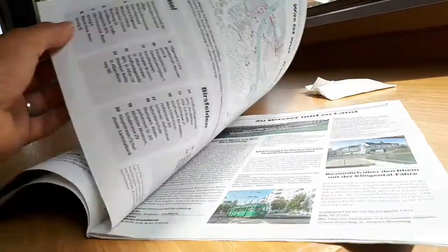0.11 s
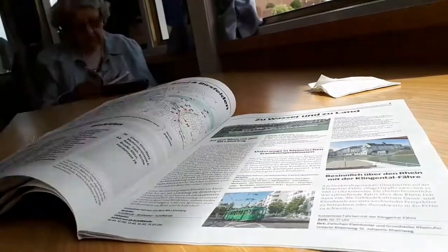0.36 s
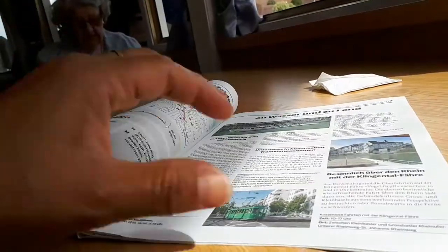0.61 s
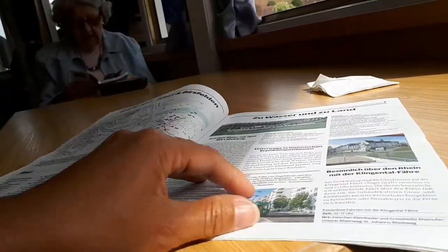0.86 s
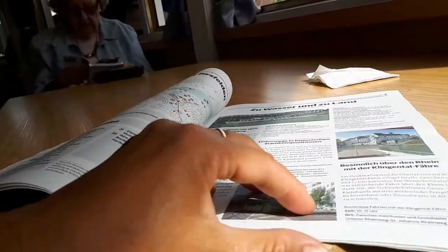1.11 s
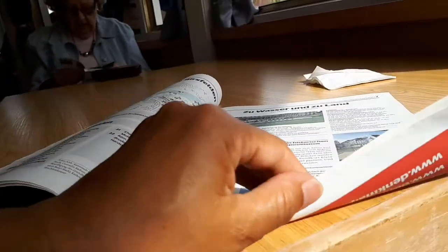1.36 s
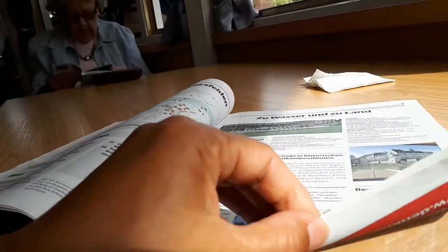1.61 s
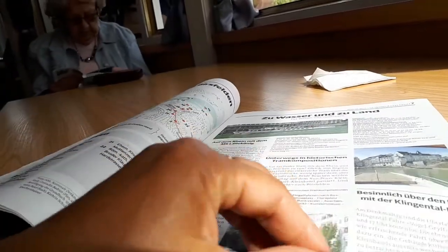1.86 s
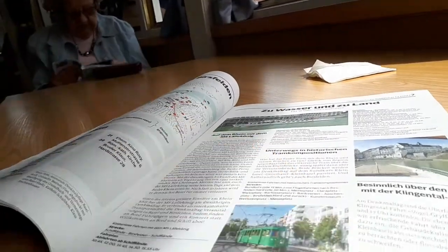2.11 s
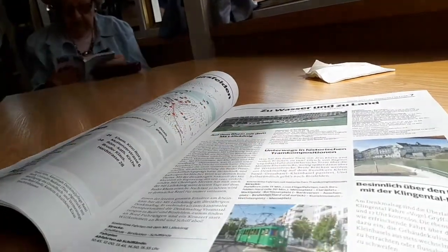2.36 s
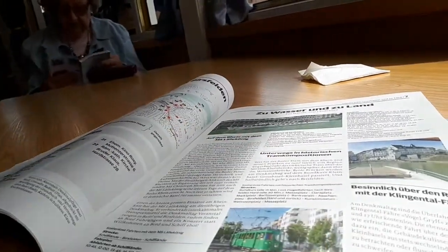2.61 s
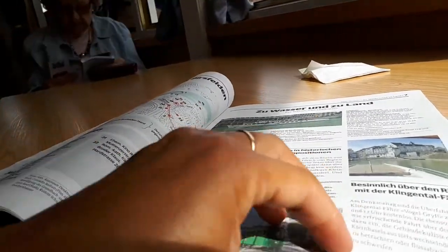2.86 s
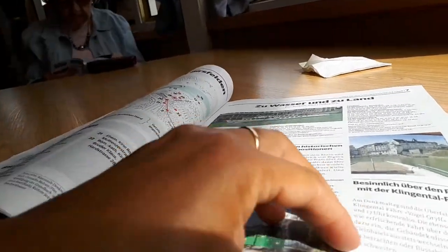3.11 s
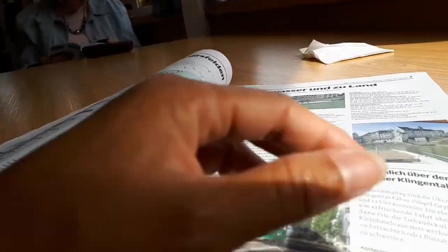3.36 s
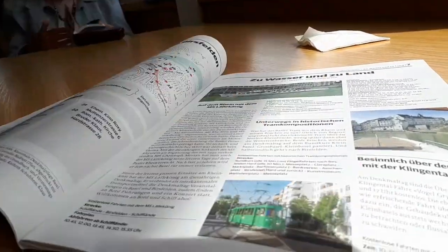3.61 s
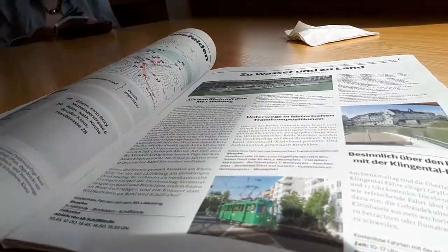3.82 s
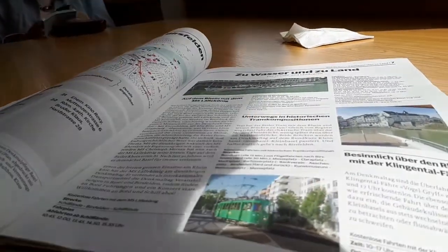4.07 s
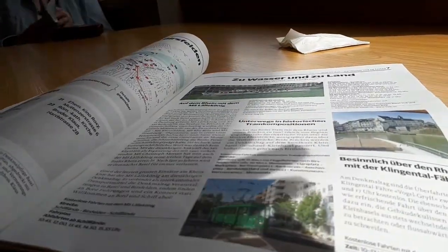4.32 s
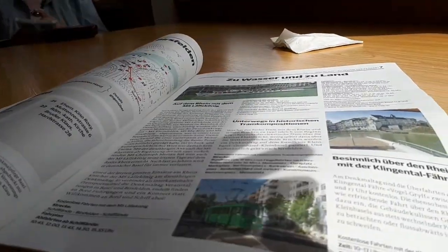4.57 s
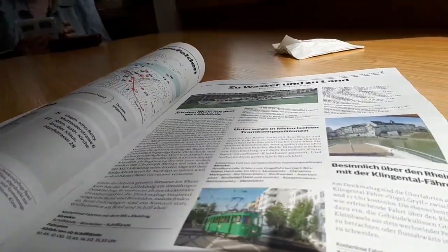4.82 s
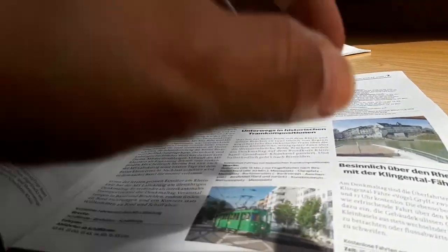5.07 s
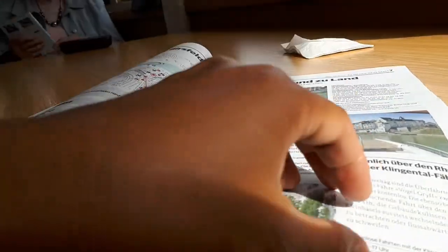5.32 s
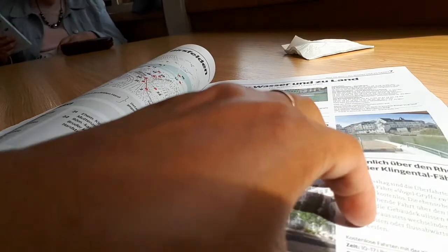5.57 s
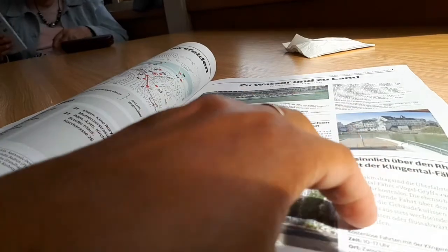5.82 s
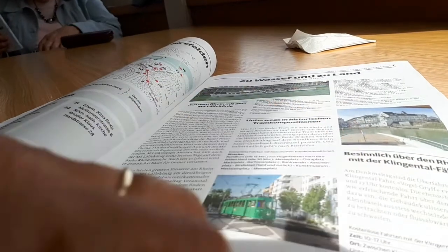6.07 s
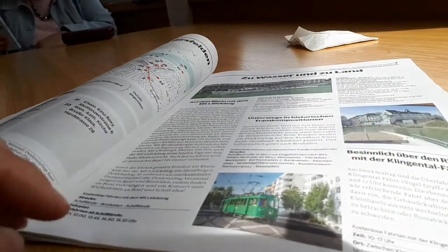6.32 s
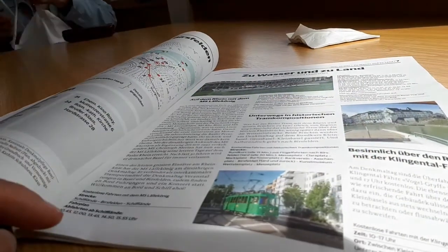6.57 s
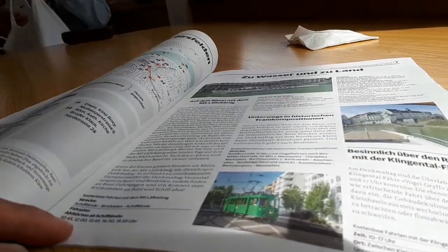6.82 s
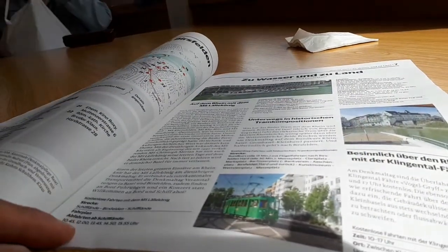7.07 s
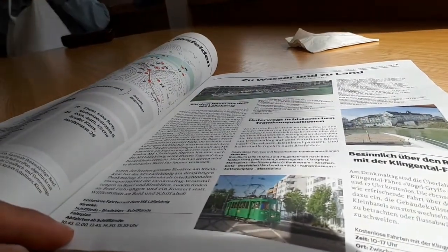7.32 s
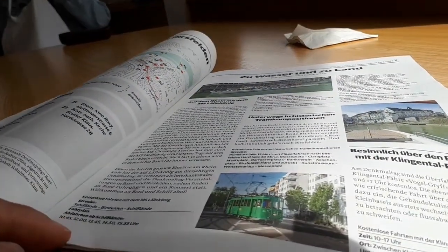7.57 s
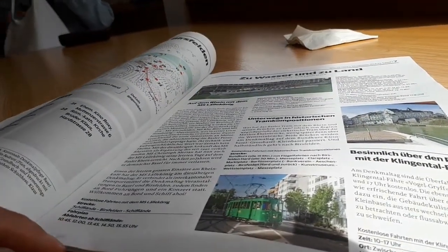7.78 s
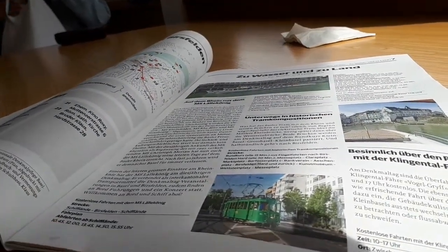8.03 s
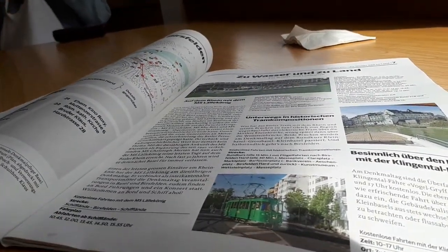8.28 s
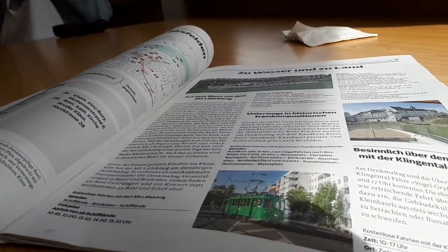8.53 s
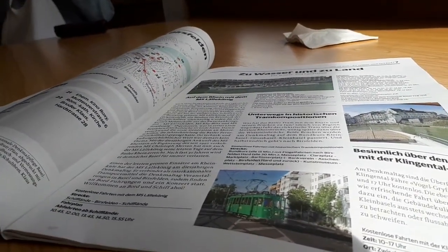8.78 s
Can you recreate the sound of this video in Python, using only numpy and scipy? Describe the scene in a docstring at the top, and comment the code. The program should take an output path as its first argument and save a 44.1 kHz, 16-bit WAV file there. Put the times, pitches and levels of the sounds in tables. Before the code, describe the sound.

Continuous low engine drone dominates, wavering slightly, wrapped in dull rumbling wash from hull and wake. Above it sit thin airy hiss, tiny glass rattles that swell and fade, and a faint high whine strongest around three seconds. Sparse newspaper ticks and soft scrapes punctuate it. Enclosed cabin with short echoes, heard in wide stereo from the tabletop.

```python
"""Inside the cabin of a river boat under way, heard for 8.9 s at two ports of a stereo recorder on a table.
From the start a diesel hums (cosines), hull and wake roar and paper and air hiss (shaped noise), glasses
and a fitting rattle (knocks and noise into resonances), a thin whine sings and creasing paper crackles.
Paper ticks and brushes (noise bursts) begin at 0.27 s, with the strongest near 3.6 and 4.8 s. The whine
is loudest from 2.9 to 3.7 s; after 6.3 s two hum tones shift in timing against the rest."""
import sys
import numpy as np
from scipy import signal
from scipy.fft import rfft, irfft, next_fast_len
from scipy.io import wavfile
from scipy.ndimage import uniform_filter1d

SR = 44100
rng = np.random.default_rng(int(sys.argv[2]) if len(sys.argv) > 2 else 0)


def waveform_to_disk(signal):
    """Save audio, clipped to [-1, 1], as 16-bit WAV at the path in sys.argv[1]."""
    frames = np.transpose(np.atleast_2d(signal))
    scaled = np.clip(frames, -1, 1) * 32767
    samples = np.round(scaled).astype(np.int16)
    wavfile.write(sys.argv[1], SR, samples)


def gain_from_decibels(decibels):
    """Convert decibel values to linear amplitude factors."""
    exponent = np.asarray(decibels, float) / 20
    return 10 ** exponent


N = 392931
T = np.arange(N) / SR  # time of each sample, s
FFT_SIZE = next_fast_len(N)
HZ = np.fft.rfftfreq(FFT_SIZE, 1 / SR)
CYCLE_HZ = 13.796  # mean rate of the engine cycle

# multiples of the engine cycle that swell as the hull loads and unloads: [multiple]
SWELLING_MULTIPLES = (6, 8, 9, 12, 15, 16, 32)
# slow drift of their strength: [t/s, then rms level/dB of multiples 6, 8, 9, 12, 15, 16, 32]
SWELL_LEVELS = [(0.0, -17, -19.5, -27, -31, -26.5, -30, -33),
                (1.2, -18.5, -18.5, -25.5, -33, -24, -31, -34),
                (2.6, -16.5, -21, -25.5, -27, -25.5, -26, -31), (3.8, -17.5, -25, -24, -29, -29, -27, -42),
                (4.4, -16.5, -24, -27.5, -25, -29, -28, -48),
                (5.4, -16, -23.5, -43, -24.5, -35, -27.5, -38),
                (6.3, -17.5, -25, -34, -23.5, -37, -29, -40), (7.0, -16, -17.5, -34, -29, -33, -29.5, -37),
                (7.8, -15, -18.5, -29, -26, -23, -24.5, -46), (8.91, -16, -18.5, -35, -31, -38, -35, -46)]


def shape(table):
    """Gain at every frequency, drawn through points of [f/Hz, level/dB]."""
    hz, db = np.transpose(table)
    return gain_from_decibels(np.interp(np.log(HZ + 1), np.log(hz), db))


def ring(hz, width):
    """Response of one resonance, with gain 1 at its centre; hz and width in Hz."""
    return 1j * HZ * width / (hz ** 2 - HZ ** 2 + 1j * HZ * width)


def through(x, gain):
    """Filter a sound by a frequency response."""
    return irfft(rfft(x, FFT_SIZE) * gain, FFT_SIZE)[..., :N]


def unit(x):
    """Scale to rms 1."""
    return x / np.sqrt(np.mean(x ** 2))


def curves(table):
    """Columns of a time table, with one value per sample."""
    seconds, *columns = np.transpose(table)
    return [np.interp(T, seconds, column) for column in columns]


def walk(rate):
    """Slow random wander: levels drawn rate times a second, smoothed twice; spread near 1."""
    hold = int(SR / rate)
    steps = np.repeat(rng.standard_normal(N // hold + 1), hold)
    return 1.69 * uniform_filter1d(uniform_filter1d(steps, hold), hold)[:N]


def diffuse(x, direct=0.095):
    """Sound from all sides is alike at two spaced ports in the bass only; a share comes straight
    from the right and reaches the left port late."""
    port_gap_m, port_lag_s = 0.18, 0.00037
    from_all_sides = np.sinc(2 * HZ * port_gap_m / 343)  # speed of sound 343 m/s
    from_right = np.exp(2j * np.pi * HZ * port_lag_s)
    alike = (1 - direct) * from_all_sides + direct * from_right
    right = through(x[0], alike) + through(x[1], np.sqrt(1 - abs(alike) ** 2))
    return np.array([x[0], right])


def throb(count, depth_db, turns):
    """Gain that beats count times per engine cycle."""
    return gain_from_decibels(depth_db * np.cos(2 * np.pi * (count * CYCLE_HZ * T - turns)))


def hum(waver_db=1.8, waver_turns=0.03, port_lead=0.006, swell_db=1.5):
    """Near-pure multiples of the engine cycle; the higher ones waver more in level and timing."""
    # steady tones of the engine, before wavering: [multiple of the cycle rate, rms level/dB]
    steady_tones = [(3, -50), (4, -16.5), (7, -28), (10, -36), (11, -30), (13, -41), (14, -32), (17, -39),
                    (18, -35), (19, -35.5), (20, -35.5), (21, -40), (22, -39), (24, -33.5), (25, -40),
                    (26, -37), (28, -37)]
    # bending waves in the plating are faster at high pitch; lead of multiple k = a + b k + c k^2:
    # [a, b, c], all in turns
    lead_turns = (.418, .100, -.0910)
    # the governor hunts: [t/s, lead of the cycle over its mean speed/turns]
    hunting = [(0.0, -.011), (.9, .005), (2.0, .013), (4.3, -.018), (5.0, -.014), (6.7, .013), (7.2, .005),
               (8.91, .005)]
    # multiples 6 and 9 slip against the rest: [t/s, shift of 6/turns, shift of 9/turns]
    slipping = [(0.0, .01, -.04), (6.3, .01, -.04), (6.9, -.09, .11), (8.91, -.10, .11)]
    mount_hz, mount_spread_hz = 133, 11

    def waver_share(k):
        return min((k - 4) / 8, 1)

    tones = [(k, db + waver_share(k) * waver_db * walk(2.67)) for k, db in steady_tones]
    swelling = zip(SWELLING_MULTIPLES, curves(SWELL_LEVELS))
    tones += [(k, db + waver_share(k) * swell_db * walk(5.0)) for k, db in swelling]
    cycle = CYCLE_HZ * T + uniform_filter1d(curves(hunting)[0], size=SR // 2)
    slip = dict(zip((6, 9), curves(slipping)))
    out = 0
    for k, db in tones:
        drift = min(((k - 4) / 8) ** 2, 1) * waver_turns * walk(3.02)
        turns = k * cycle + np.polyval(lead_turns[::-1], k) + drift + slip.get(k, 0)
        if k % 2:
            # odd multiples, from unequal cylinders, turn by up to half a turn across a resonance,
            # perhaps of the mounts
            turns += 0.25 + np.arctan((k * CYCLE_HZ - mount_hz) / mount_spread_hz) / (2 * np.pi)
        port_shift = port_lead * k * np.array([[1], [-1]])  # radians, left and right
        out = out + np.sqrt(2) * gain_from_decibels(db) * np.cos(2 * np.pi * turns + port_shift)
    return out


def roar(echo_db=-14, t60=0.4, flicker_db=0.6):
    """Noise in the plating and wake, coloured by cabin echoes; octaves flicker, panels ring and swell,
    and all of it beats with the engine cycle."""
    # broad colour of hull and wake: [f/Hz, level per Hz/dB]
    roar_colour = [(25, -55.5), (40, -60.5), (55, -54.5), (75, -50), (100, -47), (117, -44), (133, -51),
                   (150, -47), (190, -44), (255, -42), (300, -44), (420, -44), (520, -48), (620, -50),
                   (750, -53.5), (1200, -56.5), (2300, -68), (4300, -77), (5000, -82), (7000, -89),
                   (10000, -105)]
    # slow change of level, above the lowest octaves: [t/s, low roar level/dB, high roar level/dB]
    wash = [(0.0, 0.5, 1.5), (1.1, -0.5, -.5), (2.4, -0.5, 0.5), (3.4, -1, 0.5), (4.4, 0, 0.5),
            (5.5, -0.7, -1.1), (6.1, 0, 0), (7.2, -1.1, -0.7), (8.91, -1.5, 0)]
    # panels that ring within the roar: [f/Hz, width/Hz, level above the roar/dB]
    panels = [(66, 8, 5), (86, 3.5, 9), (163, 4, 8), (181, 6, 1), (209, 4, 7), (253, 6, 2), (326, 10, 1),
              (352, 8, 2.5), (393, 8, 0)]
    panel_swell_db, panel_swells_per_s = 1.2, 1.5
    panel_follow = 0.6  # share of a close multiple's swell that a panel takes on

    def noise():
        return rng.standard_normal((2, N)) * np.sqrt(SR / 2)

    colour = shape(roar_colour)
    echo_size = 1 << 14
    echoes = rng.standard_normal((2, echo_size)) * gain_from_decibels(-60 * T[:echo_size] / t60)
    echoes = rfft(echoes / np.sqrt(np.sum(echoes ** 2, axis=1, keepdims=True)), FFT_SIZE)
    cabin = (1 + gain_from_decibels(echo_db) * echoes) / np.sqrt(1 + gain_from_decibels(2 * echo_db))
    plating = noise()
    low_db, high_db = curves(wash)
    out = 0
    for octave in range(5, 15):  # bands centred on 2 ** octave Hz
        band = np.cos(np.pi / 2 * np.clip(np.log2(HZ + 1) - octave, -1, 1)) ** 2
        level_db = flicker_db * walk(7.0)
        if octave > 7:
            level_db = level_db + (low_db if octave < 10 else high_db)
        out = out + through(plating, colour * cabin * band) * gain_from_decibels(level_db)
    swells = {k: db - db.mean() for k, db in zip(SWELLING_MULTIPLES, curves(SWELL_LEVELS))}
    for hz, width, db in panels:
        level_db = db + panel_swell_db * walk(panel_swells_per_s)
        level_db += panel_follow * swells.get(round(hz / CYCLE_HZ), 0)
        out = out + gain_from_decibels(level_db) * through(noise(), colour * ring(hz, width))
    beat = throb(1, depth_db=0.68, turns=0.69) * throb(2, depth_db=0.65, turns=1.0)
    return diffuse(out * beat)


def bouts():
    """How hard the table is shaken: each bout swells and dies away about equally fast."""
    # bouts of harder chatter: [t of the peak/s, strength (1 = full bout)]
    shakes = [(.02, 0.8), (.6, 0.2), (.84, 0.4), (1.14, 0.8), (1.3, 0.6), (1.6, 0.6), (2.13, 0.9),
              (2.71, 1), (3.0, 1.1), (3.25, 0.9), (3.57, 1), (3.9, 0.2), (4.39, 0.8), (4.69, 0.6),
              (4.91, 0.5), (5.26, 0.2), (5.91, 0.9), (6.45, 0.3), (7.37, 1), (7.79, 0.8), (8.0, .6),
              (8.54, 0.9)]
    rise_s, fall_s = 0.098, 0.096
    each = [strength * np.exp(np.where(T < s, (T - s) / rise_s, (s - T) / fall_s))
            for s, strength in shakes]
    return np.max(each, axis=0)


def hiss(grain=1.7):
    """Fine uneven grains of paper and air, little alike at the two ports."""
    # colour of the hiss: [f/Hz, relative level per Hz/dB]
    hiss_colour = [(2500, -30), (5000, -5), (8300, -2.5), (8950, -13), (10300, -7), (11800, -3.5),
                   (13000, -7), (14100, -14), (14600, 3), (15200, -4)]
    rest_db, bout_db = -51, 5  # level at rest; rise in a full bout
    grains = rng.standard_normal((2, N)) * gain_from_decibels(grain * rng.exponential(size=N))
    coloured = unit(diffuse(through(grains, shape(hiss_colour)), direct=0.22))
    return coloured * gain_from_decibels(rest_db + bout_db * bouts() + 1.3 * walk(19.0))


def tableware(rate=500, scatter=1.9, apart_db=1.4):
    """Random knocks ring glass and cutlery, harder in the bouts; a loose fitting buzzes with each firing."""
    # resonances of glass and cutlery: [f/Hz, width/Hz, relative level/dB]
    glass_tones = [(3980, 25, 6.5), (4720, 14, 2.5), (5460, 25, 0), (5294, 30, 3), (6500, 30, -15),
                   (6760, 30, -15), (7140, 30, -20), (8250, 33, -1), (8793, 40, -11), (9340, 160, -9),
                   (9830, 110, -12), (10550, 210, -24), (13210, 56, -18), (13580, 50, -19)]
    # buzz of the loose fitting: [t/s, level/dB]
    fitting_levels = [(0.0, -56), (2.0, -60), (2.7, -54), (4.0, -65), (4.4, -53), (5.0, -55), (6.4, -52),
                      (8.91, -52)]
    rest_db, bout_db = -52.5, 7
    glass_db = rest_db + bout_db * bouts()
    fitting_db = curves(fitting_levels)[0] + 0.6 * walk(6.9)
    # rate is in knocks per second at each port
    knocks = (rng.random((2, N)) < rate / SR) * gain_from_decibels(scatter * rng.exponential(size=(2, N)))
    glass = 0
    for hz, width, db in glass_tones:
        # each resonance also wanders in level by itself
        glass = glass + gain_from_decibels(db + apart_db * walk(5.0)) * through(knocks, ring(hz, width))
    firings = rng.standard_normal((2, N)) * throb(4, depth_db=8, turns=0.33)  # four per cycle
    buzz = through(firings, ring(5684, 200) ** 2)
    return gain_from_decibels(glass_db) * unit(glass) + gain_from_decibels(fitting_db) * unit(buzz)


def whine():
    """A thin whine, perhaps from a pump: two narrow bands of noise that slowly change level together."""
    # bands of the whine: [f/Hz, width/Hz, relative level/dB]
    whine_bands = [(4020, 12, 0), (4800, 12, -1)]
    # loudness of the whine: [t/s, level/dB]
    whine_levels = [(0.0, -62), (2.6, -62), (2.9, -56), (3.7, -56), (4.3, -58), (4.6, -64), (8.91, -62)]
    noise = rng.standard_normal((2, N))
    response = sum(gain_from_decibels(db) * ring(hz, width) for hz, width, db in whine_bands)
    return gain_from_decibels(curves(whine_levels)[0]) * unit(through(noise, response))


def crackle(rate=260, scatter=4.0, rest_db=-63, bout_db=11):
    """Tiny random clicks of creasing paper through a broad resonance, louder in the bouts of shaking."""
    strength = gain_from_decibels(scatter * rng.exponential(size=N).clip(0, 3))
    clicks = (rng.random(N) < rate / SR) * strength * rng.standard_normal((2, N))
    return gain_from_decibels(rest_db + bout_db * bouts()) * unit(through(clicks, ring(6200, 8000) ** 2))


def paper():
    """Short uneven bursts that rise fast and fade; the table top returns each almost at once."""
    # paper ticks and brushes: [t/s, peak level/dB, left minus right/dB, centre f/Hz, fade time/s]
    ticks = [(0.272, -25, 10, 6500, 0.00056), (.7790, -37, 0, 10000, 0.017), (.9517, -35, 0, 7000, .0008),
             (1.207, -42, -4, 11000, .004), (2.846, -35, -4, 8000, 0.004), (2.9600, -38, -2, 9000, .015),
             (3.556, -22.5, 2, 2700, 0.015), (3.558, -33, 2, 6500, .011), (3.578, -31, 2, 4500, .011),
             (3.636, -27.5, 2, 2600, 0.018), (3.896, -40, 0, 14000, .0005), (4.5017, -35, 0, 7000, .0008),
             (4.774, -42, 12, 9000, .007), (4.7892, -22.5, 30, 13500, 0.000012),
             (4.7918, -36, 14, 8000, .0005), (4.7975, -35, 8, 9000, .0006), (5.903, -34, -1, 5000, .012),
             (8.49, -31, 0, 4500, .010)]
    echo_s = 52e-6  # delay of the return from the table top
    size = 8192
    t = T[:size]
    out = np.zeros((2, N))
    for s, db, pan_db, hz, length in ticks:
        start = int(s * SR)
        uneven = gain_from_decibels(4.5 * np.repeat(rng.standard_normal(128), 64))
        grit = rng.standard_normal(size)
        # the very shortest tick is a smooth pulse without grit
        burst = (grit if length > 1e-4 else 1) * uneven * t * np.exp(-t / length)
        burst = burst + 1.2 * np.interp(t - echo_s, t, burst)
        band = signal.butter(2, [hz / 3, min(hz * 1.8, 18000)], "band", fs=SR, output="sos")
        burst = signal.sosfilt(band, burst)
        port_gains = gain_from_decibels(db + np.array([pan_db, -pan_db]) / 2)
        out[:, start:start + size] += np.outer(port_gains, burst / abs(burst).max())
    return out


def scene():
    """Engine, hull, table and paper together."""
    return hum() + roar() + hiss() + tableware() + whine() + crackle() + paper()


def low_pass(x):
    """Removes everything above the highest recorded frequency."""
    return signal.sosfilt(signal.butter(12, 15690, fs=SR, output="sos"), x)


def record(dry):
    """The two ports differ in colour and lose the top; the loudest peaks are rounded."""
    # difference between the ports: [f/Hz, left minus right/dB]
    port_difference = [(60, 0), (110, 1), (200, 0), (380, 2.5), (700, 2), (1290, -1), (2380, -3),
                       (4400, -3.5), (8120, 2.5), (15000, -3)]
    top_hz = 15200
    tilt = np.sqrt(shape(port_difference))  # half of the difference goes to each port
    wet = through(dry, np.array([tilt, 1 / tilt]) / (1 + (HZ / top_hz) ** 120))
    mix = wet / (1 + wet ** 8) ** (1 / 8)
    return low_pass(mix)


dry = scene()
out = record(dry)
waveform_to_disk(out)
```